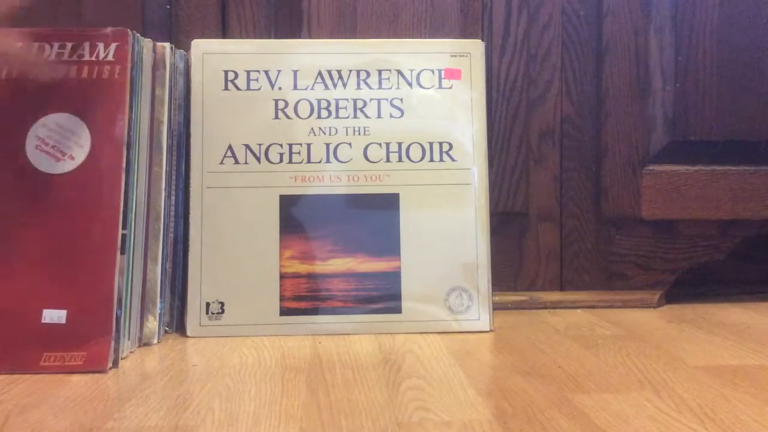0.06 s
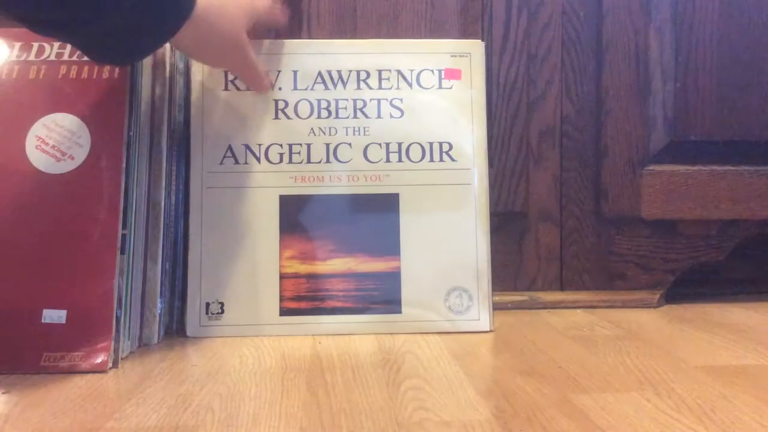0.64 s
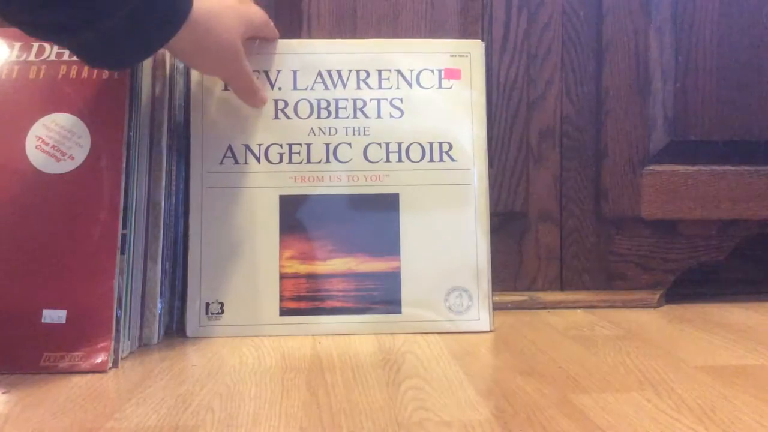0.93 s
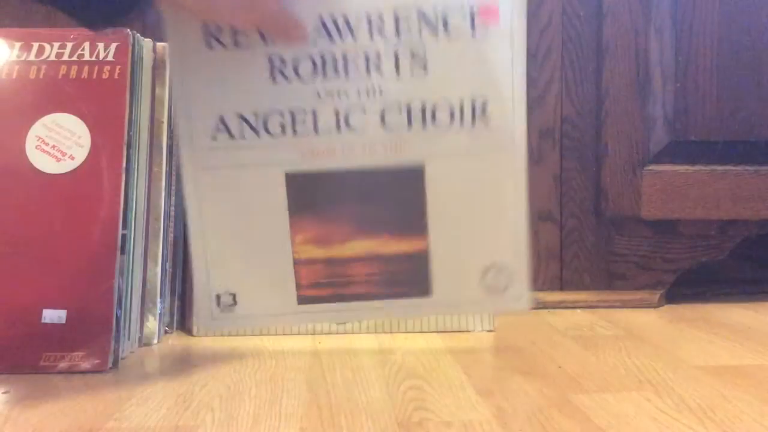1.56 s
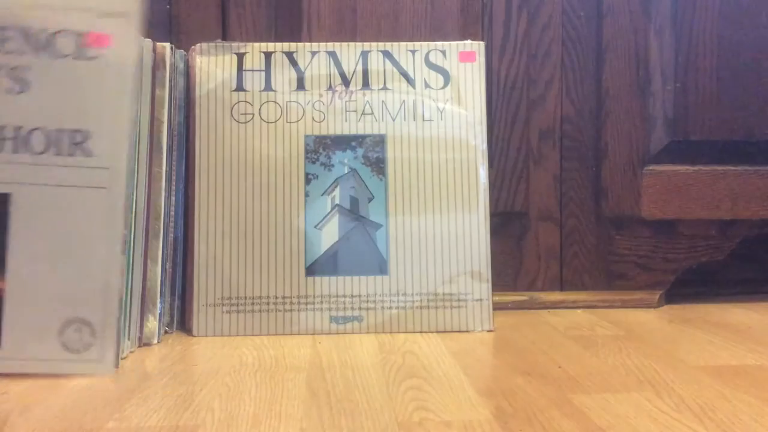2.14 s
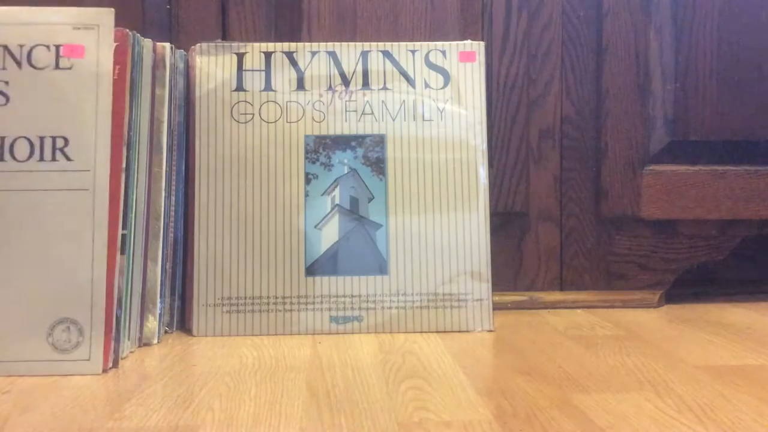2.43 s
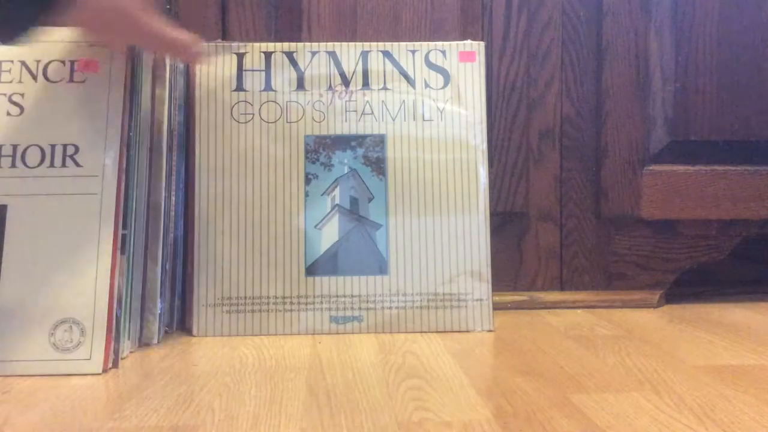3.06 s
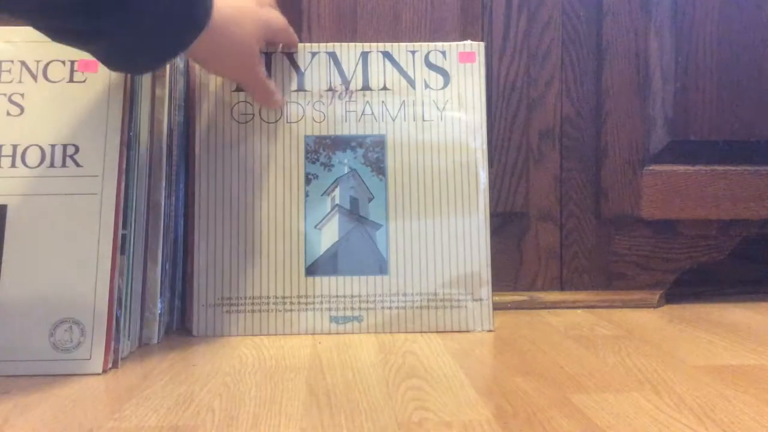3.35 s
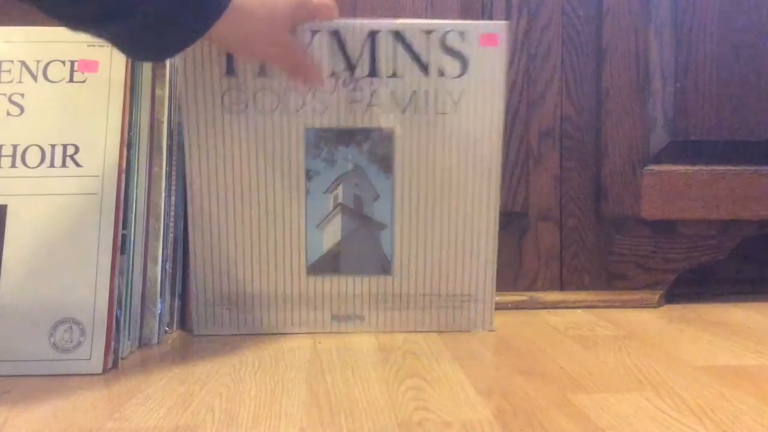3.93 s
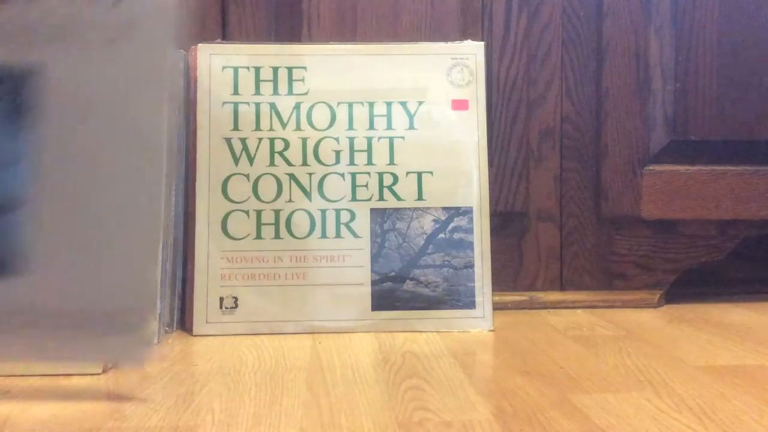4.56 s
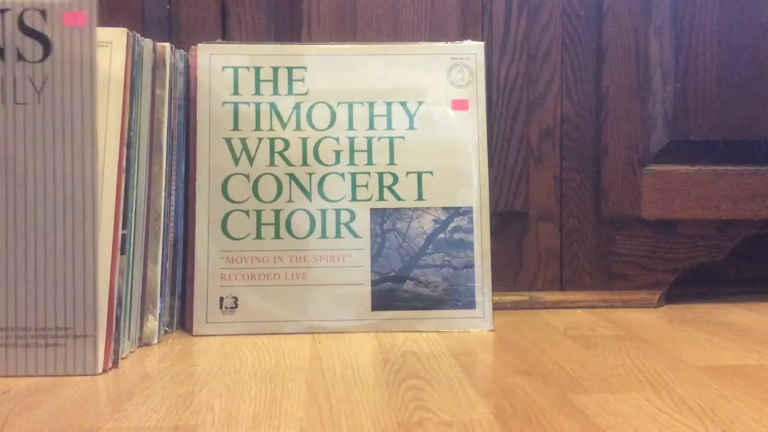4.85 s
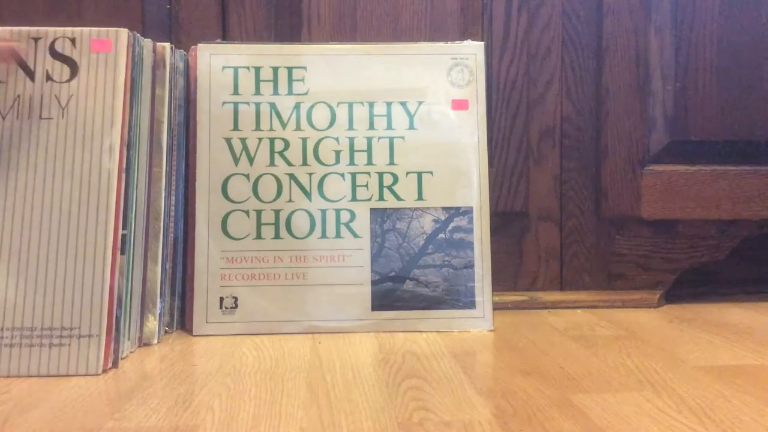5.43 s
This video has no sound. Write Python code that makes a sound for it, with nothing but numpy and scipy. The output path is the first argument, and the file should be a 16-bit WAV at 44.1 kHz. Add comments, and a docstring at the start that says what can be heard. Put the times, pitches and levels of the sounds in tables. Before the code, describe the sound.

Over the faint, steady hum of an appliance in a small room, two record sleeves in plastic film are moved one after the other, heard up close. Each move starts with soft rubs, ticks and tiny squeaks of film, followed by a barely audible swish and a cluster of short, boxy knocks as the sleeve meets the stack. The first landing has a bright plastic snap, while the second knocks harder.

```python
"""Shrink-wrapped records, stacked

Shrink-wrapped sleeves are gripped, lifted off a wooden floor and set on a leaning stack, twice.
Each knock clacks a card edge, jolts the film and bounces twice while the stack rings. The film
also squeaks, rubs and pops, a hand thumps a sleeve back, and each swing makes a soft swish.
An appliance hums in the small room."""
import sys
import numpy as np
from scipy import signal
from scipy.fft import rfft, irfft, next_fast_len
from scipy.io import wavfile
from scipy.ndimage import uniform_filter1d

SR = 44100
rng = np.random.default_rng(int(sys.argv[2]) if len(sys.argv) > 2 else 0)


def wav_record(signal):
    """Record a signal, one row per channel, as 16-bit PCM in the file named by sys.argv[1]."""
    frames = np.transpose(np.atleast_2d(signal))
    bounded = np.clip(frames, -1, 1)
    # unit amplitude maps onto the largest positive 16-bit level
    quanta = np.round(bounded * 32767).astype(np.int16)
    wavfile.write(sys.argv[1], SR, quanta)


N = 251193
EDGE_LEAD_S = .0024  # a sleeve's edge touches just before the card gives


def gain_of(db):
    """Decibels to gain."""
    return 10 ** (np.asarray(db) / 20)


def unit_rms(x):
    """Scales a signal to rms 1."""
    return x / np.sqrt(np.mean(x ** 2) + 1e-20)


def curve_at(points, hz):
    """Reads a curve drawn in straight lines over log frequency."""
    point_hz, value = np.transpose(points)
    return np.interp(np.log(hz + 1), np.log(point_hz + 1), value)


def add(mix, start_s, sound):
    """Drops a sound into the mix."""
    part = mix[round(start_s * SR):][:len(sound)]
    part += sound[:len(part)]


def coloured(x, eq):
    """Shapes x with an EQ curve and scales it to rms 1."""
    size = next_fast_len(len(x), True)
    gains = gain_of(curve_at(eq, np.fft.rfftfreq(size, 1 / SR)))
    return unit_rms(irfft(rfft(x, size) * gains, size)[:len(x)])


def stroke(start_s, swell_s, fade_s):
    """Envelope of one contact: a straight swell, then an exponential fade."""
    out, t = np.zeros(N), np.arange(SR // 2) / SR
    add(out, start_s, np.minimum(t / swell_s, 1) * np.exp(-np.maximum(t - swell_s, 0) / fade_s))
    return out


def tightest_click(spectrum_db):
    """The quickest-dying click with this spectrum, at peak 1."""
    log_gain = np.log(gain_of(np.r_[spectrum_db, spectrum_db[-2:0:-1]]))
    click = np.fft.ifft(np.exp(np.conj(signal.hilbert(log_gain)))).real
    return click / abs(click).max()


# Low rush of air in the room: freq_hz, gain_db
AIR_EQ = [(20, -26), (45, -17), (62, -4.5), (105, -6), (160, 1.5), (215, -2), (280, -6.5), (430, -8),
          (600, -17.5), (1000, -21), (1550, -29.5), (4000, -38), (8000, -41), (15000, -42.5)]
# Motor tones of the appliance: pitch_hz, level_db, width_hz
MOTOR_TONES = [(57.5, -76.5, 3.9), (120.7, -72, 1.12), (191, -70.5, 2.9), (212.3, -61.5, 3.84),
               (357.4, -72, 1.81), (409.7, -78, 1.8), (473.3, -67, 2.54), (533, -78, 20), (671, -79, 25.3),
               (722, -82, 10), (2857, -89.5, 49), (2917, -89.5, 45), (6560, -94, 110)]


def appliance_hum(air_db=-58, waver=0.37, control_hz=256):
    """A bed of rushing air and motor tones that wander in level and pitch."""
    t, control_t = np.arange(N) / SR, np.arange(2048) / control_hz
    hz = np.fft.fftfreq(len(control_t), 1 / control_hz)
    out = gain_of(air_db) * coloured(rng.standard_normal(N), AIR_EQ)
    for pitch_hz, level_db, width_hz in MOTOR_TONES:
        spectra = np.fft.fft(rng.standard_normal((2, len(hz))))
        wander = np.fft.ifft(spectra * np.exp(-(hz / width_hz) ** 2)).real
        swell, drift = (np.interp(t, control_t, unit_rms(row)) for row in wander)
        turns = np.cumsum(pitch_hz + width_hz / 3 * drift) / SR
        out += gain_of(level_db) * unit_rms((1 + waver * swell) * np.sin(2 * np.pi * turns))
    return out


# Short squeaks of sticking film: start_s, swell_s, level_db, pitch_hz
SQUEAKS = [(.278, .0073, -72.5, 5300), (.528, 0.014, -71, 5350), (.603, 0.0092, -64.5, 5800),
           (2.607, .013, -71, 3800), (2.706, .0028, -69, 8700), (3.934, .004, -58.5, 3970),
           (3.934, .0035, -65.5, 2810), (3.948, 0.0059, -64, 5740)]


def film_squeaks(fade_s=.012, q=4.5):
    """Irregular slips excite one resonance of a stretched patch of film."""
    out, slips = np.zeros(N), rng.standard_normal(N)
    for start_s, swell_s, level_db, pitch_hz in SQUEAKS:
        b, a = signal.iirpeak(pitch_hz, q, SR)
        squeal = unit_rms(signal.lfilter(b, a, signal.lfilter(b, a, slips)))
        out += gain_of(level_db) * stroke(start_s, swell_s, fade_s) * squeal
    return out


# Papery rustle of slack film: freq_hz, gain_db
SLACK_EQ = [(200, 6), (700, -2), (1400, 1.5), (2500, -0.5), (4200, -0.5), (5800, -3.5), (7500, -12.5),
            (15000, -28)]
# Bright fizz of taut film: freq_hz, gain_db
TAUT_EQ = [(200, -35), (1000, -31), (2500, -29), (4200, -5.5), (7000, -4), (10000, -0.5), (13000, -0.5),
           (15500, 2)]
# Film sliding under fingers or on its neighbour: start_s, swell_s, fade_s, level_db, tautness (0-1)
RUBS = [(.481, 0.004, 0.031, -57, 0.13), (.598, 0.019, 0.0091, -63, .57), (.736, .012, .009, -64.5, .15),
        (1.222, 0.0072, .04, -71.5, .8), (2.214, 0.013, 0.054, -63, 0.57), (2.254, 0.022, 0.01, -50.5, 0.6),
        (2.352, .0073, 0.016, -62.5, 0.67), (3.81, .011, 0.041, -72, .5), (3.932, 0.0036, 0.066, -58, 0.96),
        (3.993, .028, 0.023, -56, .92), (4.814, 0.017, 0.033, -61.5, 0.6)]


def film_rubs(slips_per_s=4000, spread_db=3, hiss=0.39, clump_db=2.5,
              jolt_swell_s=.011, jolt_fade_s=0.019, jolt_tautness=0.55):
    """Countless tiny slips, in clumps, as the film slides or is jolted by a knock."""
    jolts = [(start_s - EDGE_LEAD_S, jolt_swell_s, jolt_fade_s, rustle_db, jolt_tautness)
             for start_s, *_, rustle_db in KNOCKS]
    slack_power, taut_power = np.zeros((2, N))
    for start_s, swell_s, fade_s, level_db, tautness in RUBS + jolts:
        power = (gain_of(level_db) * stroke(start_s, swell_s, fade_s)) ** 2
        slack_power += (1 - tautness) * power
        taut_power += tautness * power
    strength = np.minimum(rng.exponential(1, (2, N)), 3)
    sizes = gain_of(spread_db * strength) * rng.choice([-1, 1], (2, N))
    crackle = unit_rms(sizes * (rng.random((2, N)) < slips_per_s / SR))
    slips = crackle + hiss * rng.standard_normal((2, N))
    clumps = unit_rms(uniform_filter1d(rng.standard_normal(N), size=130))
    slips *= gain_of(clump_db * clumps)
    rustle = np.sqrt(slack_power) * coloured(slips[0], SLACK_EQ)
    fizz = np.sqrt(taut_power) * coloured(slips[1], TAUT_EQ)
    return rustle + fizz


# Boxy tone of a card edge: freq_hz, gain_db
EDGE_EQ = [(200, -18), (600, 10.5), (1000, 4), (1600, -6), (2600, -12), (5000, -19.5), (15000, -32.5)]


def edge_clacks(swell_s=10 / SR, fade_s=0.0039):
    """At each knock an edge strikes along its length: a burst of tiny contacts in stiff card."""
    force = sum(gain_of(clack_db) * stroke(start_s - EDGE_LEAD_S, swell_s, fade_s)
                for start_s, *_, clack_db, _ in KNOCKS)
    return force * coloured(rng.standard_normal(N), EDGE_EQ)


# Wrinkles of film giving way: start_s, level_db, ring_hz, tilt_db_per_octave, pop_count
WRINKLES = [(0.5086, -40, 4250, -8, 1), (.7512, -47.5, 5060, -5, 1), (.7955, -48, 5600, -5.5, 1),
            (1.2335, -54, 12000, 4, 1), (2.2593, -28, 12000, 2, 4), (2.2813, -18.5, 11900, -1.5, 1),
            (2.709, -40.5, 8550, 6, 1), (2.739, -50, 9000, 6, 1), (3.3635, -54, 5300, -6, 1),
            (3.372, -49, 5000, -5, 2), (3.936, -41.5, 12000, 2, 2), (3.989, -42, 4500, -4.5, 1),
            (4.0263, -39.5, 12500, 2, 3), (4.8704, -39, 5540, -1, 1)]


def pop_cues(gap_s=.0049, loss_db=3.5, over_clack_db=2.5, jolt_ring_hz=4300, jolt_db_per_octave=-9):
    """Each wrinkle gives one pop or a fading run of them; each clack jolts out one more."""
    runs = [(start_s + k * gap_s, level_db - k * loss_db, ring_hz, tilt)
            for start_s, level_db, ring_hz, tilt, count in WRINKLES for k in range(round(count))]
    jolts = [(start_s - EDGE_LEAD_S, clack_db + over_clack_db, jolt_ring_hz, jolt_db_per_octave)
             for start_s, *_, clack_db, _ in KNOCKS]
    return runs + jolts


def film_pops(ring_db=7, ring_octaves=0.32, low_cut_hz=1100, shiver=0.065, shiver_s=0.0033):
    """A wrinkle pops: a sharp click with one broad resonance, then the film shivers briefly."""
    out, size = np.zeros(N), 1024
    hz, t = np.fft.rfftfreq(size, 1 / SR) + 20, np.arange(size) / SR
    noises = rng.standard_normal((N // size, size))
    for (start_s, level_db, ring_hz, tilt), noise in zip(pop_cues(), noises):
        slope_db = tilt * np.log2(1 + hz / low_cut_hz)
        resonance_db = ring_db / (1 + (np.log2(hz / ring_hz) / ring_octaves) ** 2)
        bass_cut_db = 10 * np.log10(1 + (low_cut_hz / hz) ** 4)
        click = tightest_click(slope_db + resonance_db - bass_cut_db)
        drive = (t == 0) + shiver * noise * np.exp(-t / shiver_s)
        add(out, start_s, gain_of(level_db) * signal.fftconvolve(drive, click)[:size])
    return out


# Ring of the stacked sleeves: pitch_hz, level_db, t60_s
STACK_MODES = [(162.5, -14.5, 0.2), (230.8, -11, 0.1), (254, -21, .07), (390, -13, 0.051),
               (512, -22.5, 0.057), (706, -22, 0.07), (1280, -19.5, 0.037)]


def add_blow(mix, centre_s, level_db, pitch_hz, ring_db, cycles=0.72, ring_rise_s=0.0016):
    """A blow shoves the card to and fro and rings the stack; duller blows spare the high modes."""
    t = np.arange(-SR // 4, SR // 4) / SR
    after = np.maximum(t, 0)
    push = -np.sin(2 * np.pi * pitch_hz * t) * np.exp(-(pitch_hz * t / cycles) ** 2)
    ring = np.zeros(len(t))
    for mode_hz, mode_db, t60_s in STACK_MODES:
        decay = gain_of(mode_db - 60 * after / t60_s)
        ring -= decay * np.sin(2 * np.pi * mode_hz * after) / np.hypot(1, mode_hz / pitch_hz)
    ring *= gain_of(ring_db) * (1 - np.exp(-after / ring_rise_s))
    add(mix, centre_s + t[0], gain_of(level_db) * (push + ring))


# Knocks on card, which also cue clacks, pops and rustles (ring_db is relative to level_db):
# start_s, level_db, pitch_hz, ring_db, bounce_gap_s, bounce_loss_db, clack_db, rustle_db
KNOCKS = [(.4852, -40.5, 356, 10, 0.0052, 6, -50, -72), (.5105, -52, 300, -3, 0.005, 10, -52.5, -76),
          (.5965, -59, 500, -8, 0.0074, 8, -55.5, -80), (1.4135, -37.5, 284, 0, 0.0054, 3, -47.5, -62.5),
          (2.1452, -38, 333, 7.5, .012, 13, -52.5, -65.5), (2.2838, -51, 596, -6, .004, 8, -47, -62),
          (2.2944, -41.5, 384, -4, .006, 15, -58, -72), (2.3293, -26, 346, -0.5, 0.014, 4.5, -62, -68),
          (4.7298, -19, 302, -4.5, 0.01414, 12, -58.5, -61), (4.8385, -33, 624, 1, 0.0045, 9, -51.5, -74),
          (4.8896, -40, 340, 6.5, 0.0065, 6, -69, -70), (4.9175, -20, 448, -3.5, 0.0034, 14, -44.5, -73),
          (5.395, -50.5, 940, -8, .005, 10, -68, -88)]


def card_knocks(bounces=2, loss_exponent=1.57, sag_octaves_per_db=.045):
    """A sleeve knocks and bounces, each bounce weaker and lower than the last."""
    out = np.zeros(N)
    for start_s, level_db, pitch_hz, ring_db, gap_s, loss_db, _, _ in KNOCKS:
        for k in range(bounces + 1):
            lost_db = loss_db * k ** loss_exponent
            sagged_hz = pitch_hz * 2 ** (-sag_octaves_per_db * lost_db)
            add_blow(out, start_s + k * gap_s, level_db - lost_db, sagged_hz, ring_db)
    return out


def hand_thump():
    """The hand presses the first sleeve back with a soft, low thump."""
    out = np.zeros(N)
    add_blow(out, centre_s=.7456, level_db=-35.5, pitch_hz=191.5, ring_db=-1, cycles=1.4)
    return out


# Breathy tone of a swish: freq_hz, gain_db
SWISH_EQ = [(400, -20), (1200, -6), (1900, 2.5), (2450, 0), (3300, -10.5), (6000, -21.5), (15000, -23)]
# A sleeve swung aside: peak_s, half_length_s, level_db
SWINGS = [(1.833, 0.055, -76), (4.435, 0.093, -75.5)]


def sleeve_swishes():
    """A soft swish rises and falls with the speed of each swing."""
    t = np.arange(N) / SR
    speed = sum(gain_of(level_db) * np.exp(-((t - peak_s) / half_length_s) ** 2 / 2)
                for peak_s, half_length_s, level_db in SWINGS)
    return speed * coloured(rng.standard_normal(N), SWISH_EQ)


# Short tail of the small room: freq_hz, t60_s
ROOM_DECAY = [(100, 0.29), (500, 0.19), (2000, 0.29), (6000, 0.17), (15000, 0.2)]


def room_echo(send, predelay_s=.006, density=.1):
    """Sparse reflections from cabinet, floor and walls, each band dying at its own rate."""
    size = SR // 2
    taps = rng.choice([-1., 1.], size) * (rng.random(size) < density)
    taps *= np.arange(size) > predelay_s * SR
    hz, t, bands = signal.stft(taps, SR, nperseg=256)
    decay = gain_of(-60 * t / curve_at(ROOM_DECAY, hz)[:, None])
    tail = signal.istft(bands * decay, SR, nperseg=256)[1]
    return signal.fftconvolve(send, tail / np.linalg.norm(tail))[:N]


def scene(card_send_db=-14, click_send_db=-7, friction_send_db=-10):
    """The sleeves up close, their echo, and the hum behind."""
    card = card_knocks() + hand_thump()
    clicks = film_pops() + edge_clacks()
    friction = film_rubs() + film_squeaks() + sleeve_swishes()
    send = (gain_of(card_send_db) * card + gain_of(click_send_db) * clicks
            + gain_of(friction_send_db) * friction)
    return (card + clicks + friction + room_echo(send) + appliance_hum())[None]


def record(dry):
    """A steep low-pass trims the very top of the mix."""
    cutoff_hz = 15350
    low_pass = signal.firwin(511, cutoff_hz, window=("kaiser", 9), fs=SR)
    return signal.oaconvolve(dry, low_pass[None], "same")


dry = scene()
out = record(dry)
wav_record(out)
```